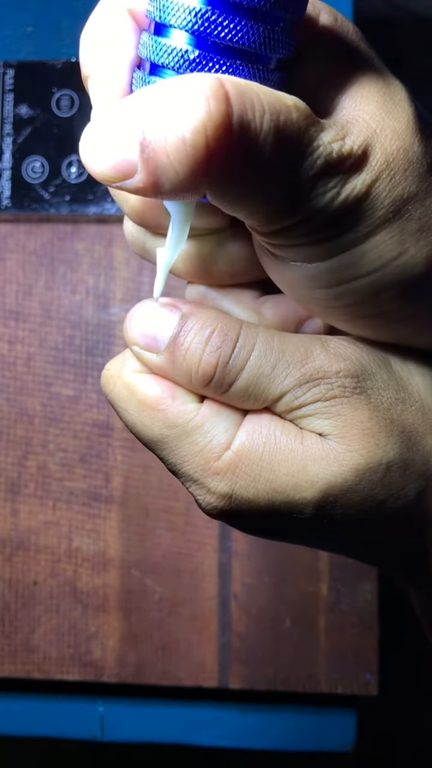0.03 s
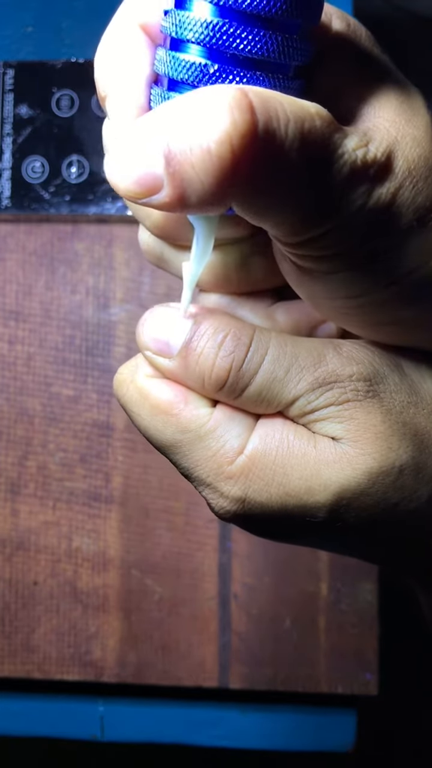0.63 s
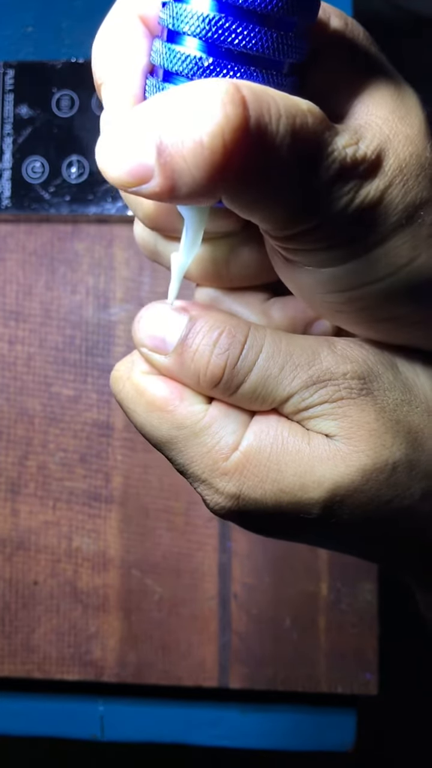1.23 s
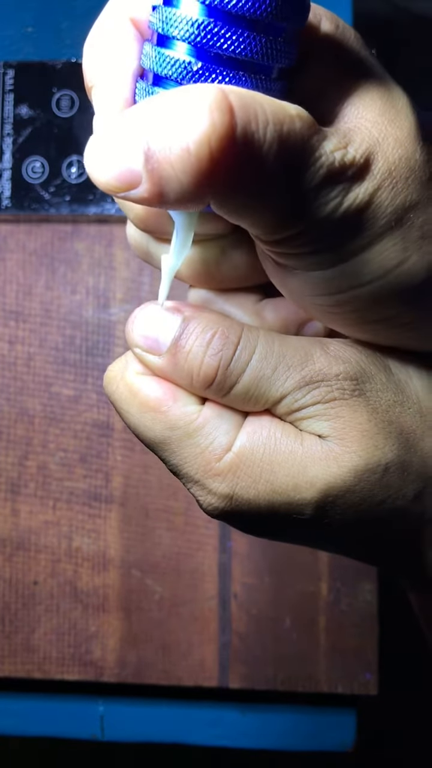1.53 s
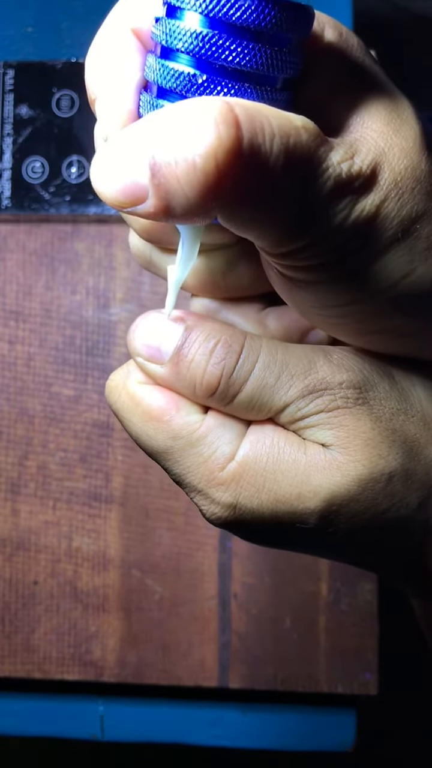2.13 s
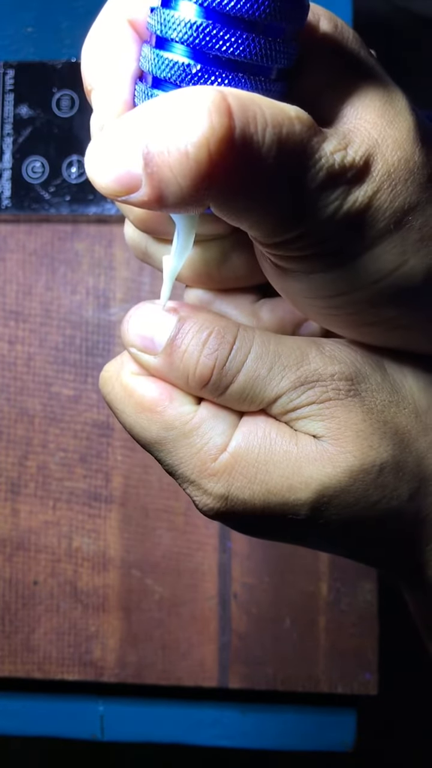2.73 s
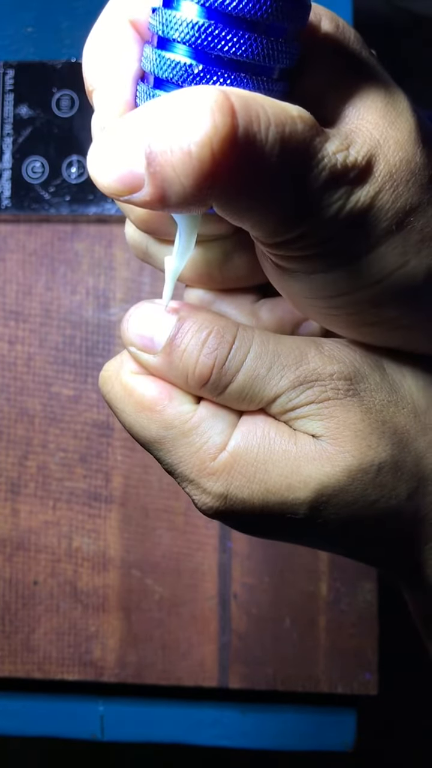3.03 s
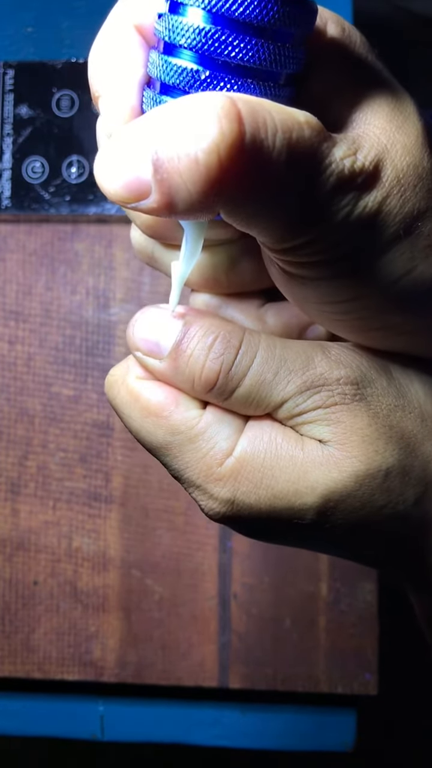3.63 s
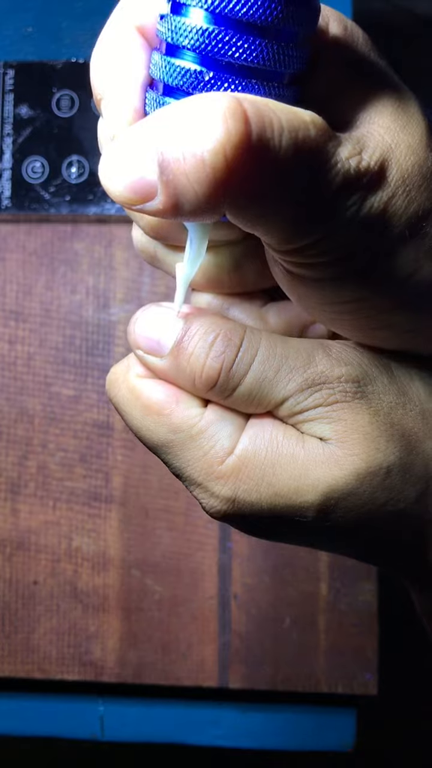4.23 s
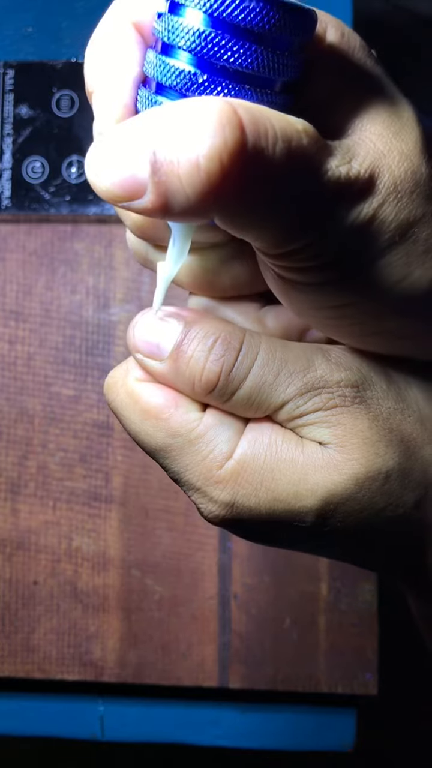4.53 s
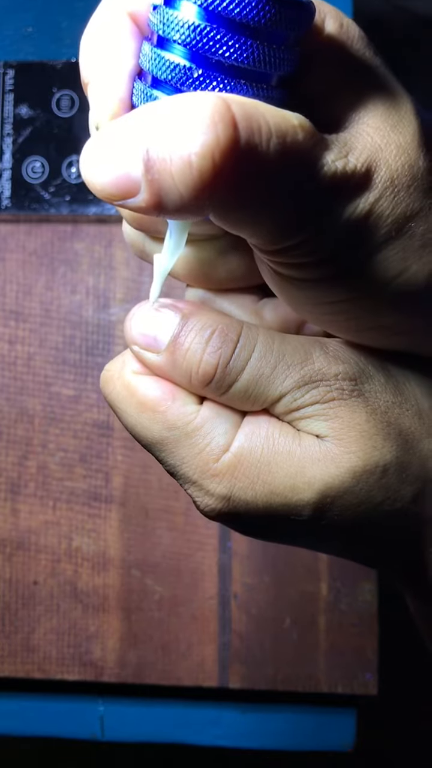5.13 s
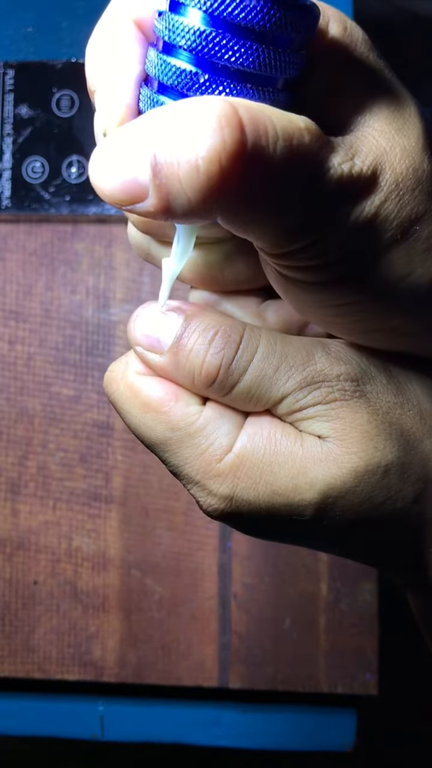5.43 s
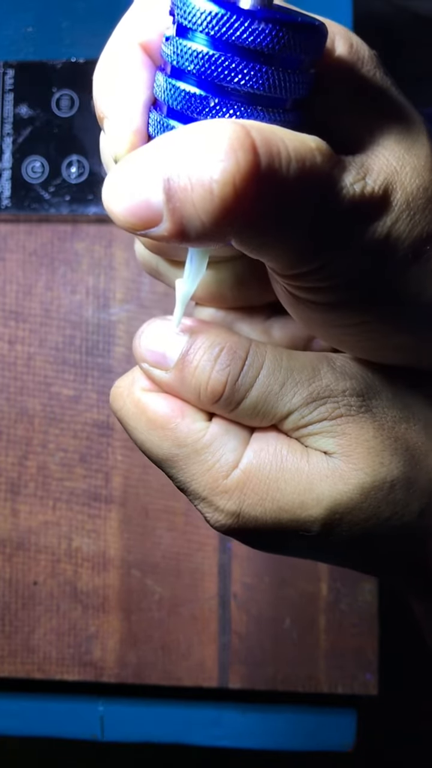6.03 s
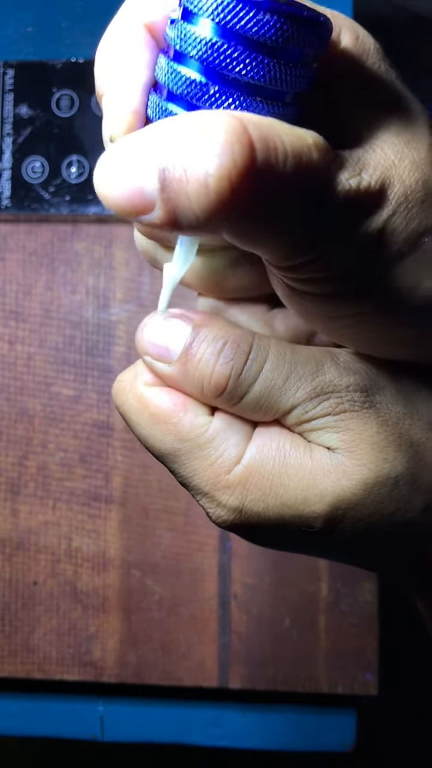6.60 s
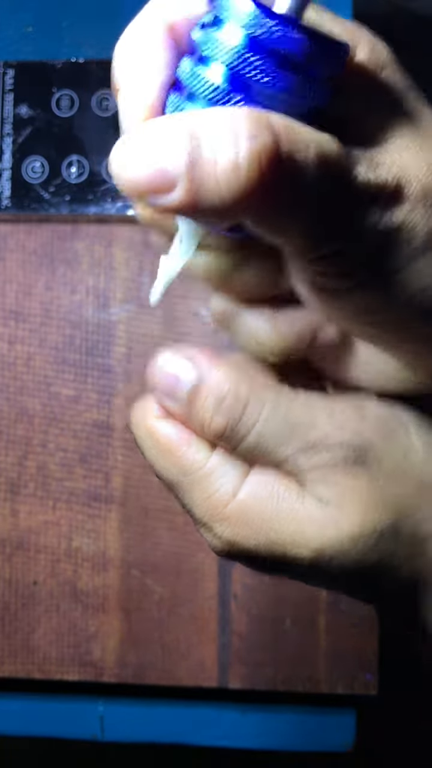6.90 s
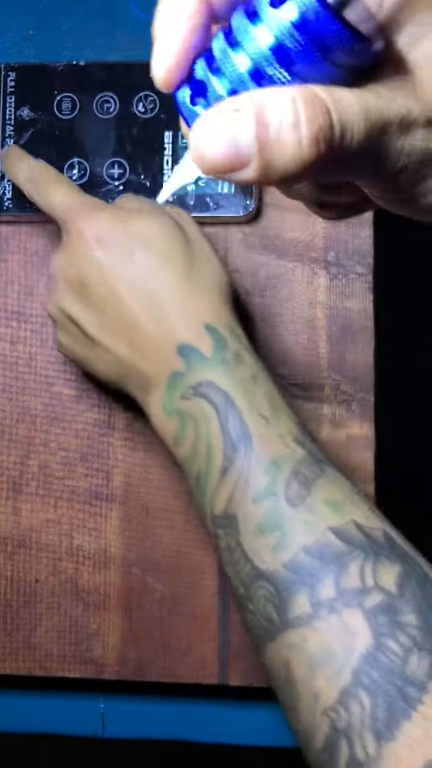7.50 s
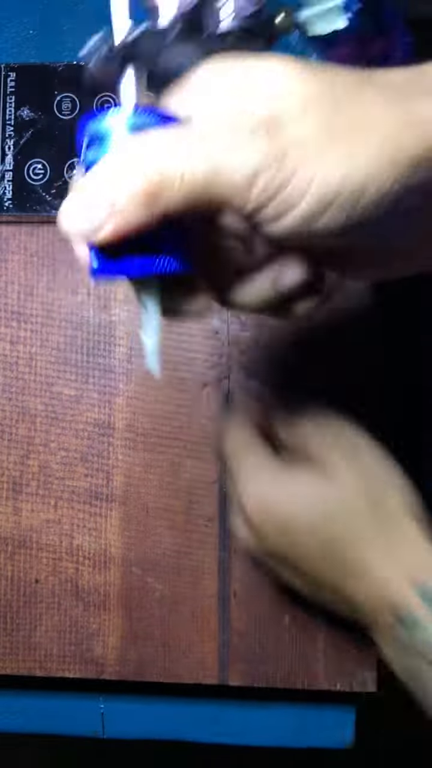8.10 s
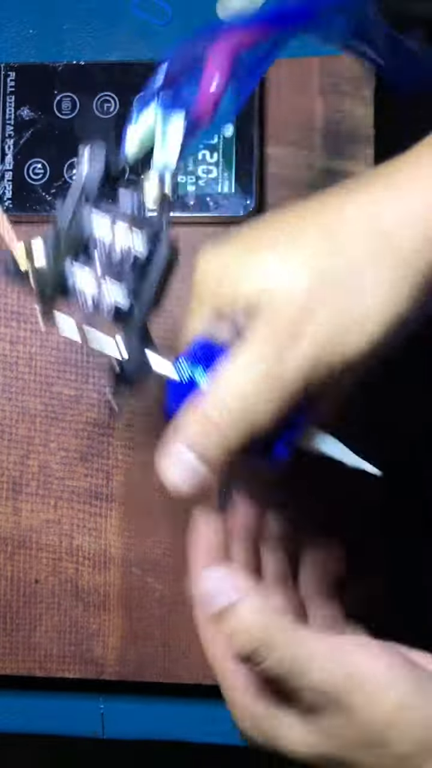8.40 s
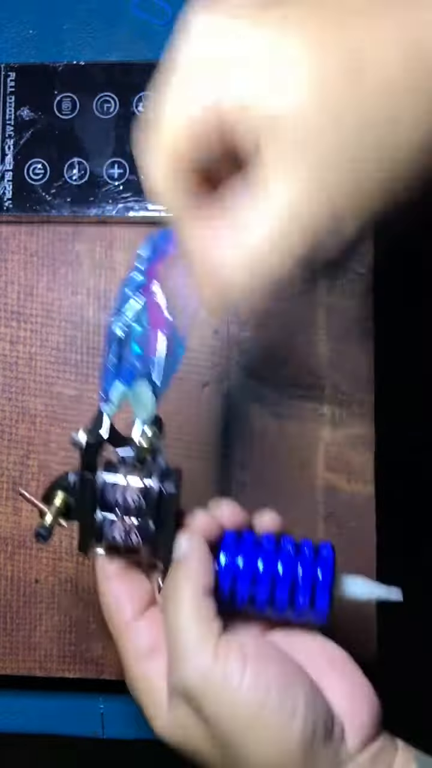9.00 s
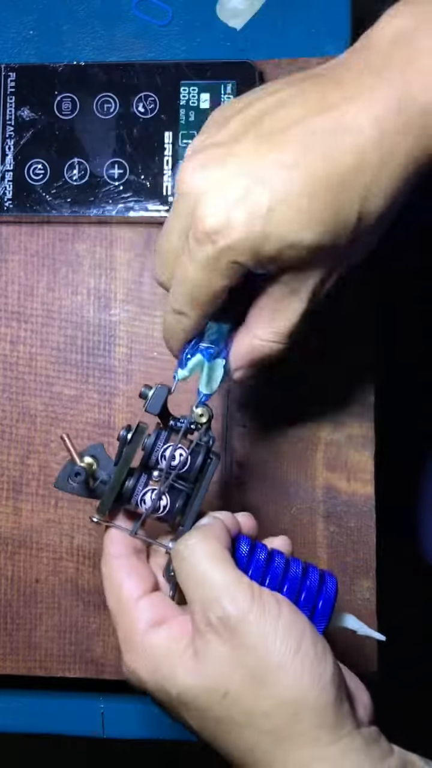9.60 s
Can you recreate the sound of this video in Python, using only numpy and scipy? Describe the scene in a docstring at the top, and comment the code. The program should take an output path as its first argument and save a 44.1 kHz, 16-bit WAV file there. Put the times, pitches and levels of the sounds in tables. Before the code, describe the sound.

Close up over a wooden workbench in a quiet room, a tattoo machine gives a continuous, sharp, rattling buzz with little bass, wavering slightly under finger pressure. Near the end the buzz opens up, then stops abruptly with a tiny squeal and a fading ring from its spring. Much quieter handling follows: soft knocks on the wood, crackling and rustling of a plastic sleeve, and small metal taps.

```python
"""A coil tattoo machine buzzes close by over a wooden workbench, its tip held against a thumbnail.
The armature strikes the coils 112 times a second, exciting the resonances of frame and tube; each
press on the nail brakes it a little and shifts its timbre. Near 7 s the tip lifts and the tone opens up.
At 7.7 s the power is cut, and the spring chatters and rings out. The machine is then turned over:
its plastic cord sleeve crinkles, the bench is knocked and the cord's wire clip taps the frame."""
import sys
import numpy as np
from scipy import signal
from scipy.fft import rfft, irfft
from scipy.io import wavfile
from scipy.ndimage import uniform_filter1d

SR = 44100
rng = np.random.default_rng(int(sys.argv[2]) if len(sys.argv) > 2 else 0)


def inscribe(sig):
    """Save sig as 16-bit PCM at rate SR to the path in sys.argv[1].

    A 1-D sig is mono; a 2-D sig holds one channel per row.
    Samples are clipped to [-1, 1] before scaling.
    """
    pcm = np.round(np.clip(np.atleast_2d(sig).T, -1, 1) * 32767)
    wavfile.write(sys.argv[1], SR, pcm.astype(np.int16))


N = 429975
TIME = np.arange(N) / SR
POWER_OFF_S = 7.732


def from_db(db):
    """Amplitude ratio of a level in decibels."""
    return np.exp(np.asarray(db) * (np.log(10) / 20))


def unit_rms(x):
    """Normalisation to unit power."""
    return x / np.sqrt(np.mean(x ** 2) + 1e-20)


def in_time(rows):
    """Linear interpolation of (time, values...) rows at every sample."""
    times, *columns = np.transpose(rows)
    return [np.interp(TIME, times, column) for column in columns]


def drift(per_s):
    """Random modulation: Gaussian values joined by straight lines."""
    count = int(per_s * N / SR) + 3
    return np.interp(TIME * per_s, np.arange(count), rng.standard_normal(count))


def swells(rows, rise_share=0.47, depth_db=19.5):
    """Exponential growth and decay about each (time, level, duration) peak; overlaps add in power."""
    power = 0
    for s, db, length in rows:
        distance = np.maximum((s - TIME) / rise_share, (TIME - s) / (1 - rise_share)) / length
        power = power + from_db(db - depth_db * np.minimum(distance, 10)) ** 2
    return np.sqrt(power)


def high_pass(x, hz, order=3):
    """Butterworth high-pass filter."""
    return signal.sosfilt(signal.butter(order, hz, "high", fs=SR, output="sos"), x)


def coloured(x, spectrum):
    """Minimum-phase filter of unit power gain, shaped by (frequency, level) rows."""
    hz, db = np.transpose(spectrum)
    grid = np.linspace(1, SR / 2, 2049)
    cepstrum = irfft(np.log(from_db(np.interp(np.log(grid), np.log(hz), db))))
    cepstrum[1:len(grid) - 1] *= 2
    cepstrum[len(grid):] = 0
    response = irfft(np.exp(rfft(cepstrum)))
    return signal.fftconvolve(x, response / np.linalg.norm(response))[:N]


def resonance(x, hz, width_hz):
    """Forced response of a two-pole resonator with unit peak gain."""
    r = np.exp(-np.pi * width_hz / SR)
    feedback = [1, -2 * r * np.cos(2 * np.pi * hz / SR), r * r]
    return signal.lfilter(np.array([1, 0, -1]) * (1 - r * r) / 2, feedback, x + 1e-18)


def ring(force, modes):
    """Modal superposition: an impulse starts one damped sinusoid per (frequency, level, T60) row."""
    out = 0
    for k, (hz, db, t60) in enumerate(modes):
        r, w = from_db(-60 / (t60 * SR)), 2 * np.pi * hz / SR
        mode = signal.lfilter([0, np.sin(w)], [1, -2 * r * np.cos(w), r * r], force + 1e-18)
        out = out + (-1) ** k * from_db(db) * mode
    return out


def impulses(times, heights):
    """Band-limited impulses: windowed sinc pulses placed between the samples."""
    centres = np.asarray(times)[:, None] * SR
    taps = centres.astype(int) + np.arange(-7, 9)
    shape = np.sinc(taps - centres) * np.sinc((taps - centres) / 8)
    out = np.zeros(N)
    np.add.at(out, np.clip(taps, 0, N - 1), shape * np.asarray(heights)[:, None])
    return out


# Spectrum of the workshop air: (frequency [Hz], relative density [dB])
AIR_SPECTRUM = [(20, -30), (45, -1), (70, -2.5), (120, -5.5), (400, -9.5), (1000, -9), (1600, -13),
                (2800, -18), (6000, -23), (16000, -43)]
# Swells of low rumble: (time [s], peak level [dB], duration [s])
RUMBLE_SWELLS = [(4.65, -67, 1.6), (5.7, -60, 2.5), (8.7, -70, 5.5)]
# Envelope of a faint hiss: (time [s], level before filtering [dB])
HISS_LEVELS = [(7.6, -54), (8.15, -58.5), (8.4, -68), (8.95, -73.5), (9.1, -63), (9.75, -63.5)]
def background(air_db=-60):
    """Ambient noise: steady air, swelling rumble and hiss add as incoherent sources."""
    air = from_db(air_db) * coloured(rng.standard_normal(N), AIR_SPECTRUM)
    rumble_spectrum = [(20, -17), (48, -6), (130, -12), (280, -10), (600, -19), (2000, -42.5)]
    rumble = swells(RUMBLE_SWELLS) * coloured(rng.standard_normal(N), rumble_spectrum)
    hiss = from_db(in_time(HISS_LEVELS)[0]) * high_pass(rng.standard_normal(N), hz=2480, order=1)
    return high_pass(air + rumble, hz=36, order=4) + hiss


# Faint tones: (start [s], duration [s], first pitch [Hz], middle pitch [Hz], last pitch [Hz], level [dB])
TONE_GLIDES = [(7.75, 0.66, 2150, 2297, 2290, -66), (7.698, 0.973, 567.6, 559.8, 507, -64),
               (7.798, 0.59, 1390, 1379, 1393, -69.5), (8.248, 0.24, 1150, 1249, 1298, -63),
               (8.398, 0.657, 1400, 1423, 1404, -66), (8.499, 0.345, 1255, 1263, 1253, -69),
               (9.22, .6, 13200, 14500, 13000, -60.5)]
def faint_tones(blur_at_1khz_per_s):
    """Narrow-band noise: random modulation blurs thin tones that swell, glide and fade."""
    out = np.zeros(N)
    for s, length, first, middle, last, db in TONE_GLIDES:
        span = (TIME > s) & (TIME < s + length)
        progress = (TIME[span] - s) / length
        hz = np.polyval(np.polyfit([0, .5, 1], [first, middle, last], 2), progress)
        phase = 2 * np.pi * np.cumsum(hz) / SR
        per_s = blur_at_1khz_per_s * np.sqrt(middle / 1000)
        tone = drift(per_s)[span] * np.sin(phase) + drift(per_s)[span] * np.cos(phase)
        out[span] += from_db(db) * np.sin(np.pi * progress) * tone
    return out


def room(x, t60_s=0.18, level_db=-10.5, delay_s=0.004):
    """Reverberation: a thin, diffuse tail decays exponentially after the nearest walls answer."""
    age = TIME[:SR // 2]
    tail = rng.standard_normal(len(age)) * from_db(-60 * age / t60_s) * (age > delay_s)
    treble = high_pass(x, hz=2225, order=1)
    return from_db(level_db) * signal.fftconvolve(treble, tail / np.linalg.norm(tail))[:N]


# Knocks on the bench: (time [s], relative level [dB])
BENCH_KNOCKS = [(7.904, -45), (8.049, -57), (8.865, -68), (9.112, -56.5), (9.391, -53), (9.644, -63)]
# Modes of the bench top: (frequency [Hz], relative level [dB], T60 [s])
BENCH_MODES = [(368, -2, 0.29), (942, 3.5, 0.118), (1071, 7, 0.069), (1433, -1, 0.082), (1782, -7.5, 0.049),
               (2465, 5, 0.072)]
def bench_knocks(wood_db, crack_db, crack_s):
    """Impact excitation: each knock rings the modes of the wood under a dull crack."""
    times, db = np.transpose(BENCH_KNOCKS)
    hits = impulses(times, from_db(db))
    envelope = signal.lfilter([1], [1, -np.exp(-1 / (crack_s * SR))], hits)
    crack_spectrum = [(200, -17.5), (1000, 1.5), (2800, -1), (5000, -12), (15000, -16)]
    crack = coloured(envelope * rng.standard_normal(N), crack_spectrum)
    return from_db(wood_db) * ring(hits, BENCH_MODES) + from_db(crack_db) * crack


# Taps of the cord's wire clip: (time [s], ring level [dB], frequency [Hz])
CLIP_TAPS = [(9.304, -47, 2700), (9.311, -49, 3000), (9.4535, -42, 2500), (9.4712, -42, 2700),
             (9.484, -47, 3100), (9.512, -47, 3000), (9.729, -44, 3550)]
def clip_clinks(t60_s, tick_db):
    out = 0
    for s, db, hz in CLIP_TAPS:
        tick = high_pass(impulses([s], [from_db(db + tick_db)]), hz=2000, order=1)
        out = out + tick + ring(impulses([s], [1]), [(hz, db, t60_s)])
    return out


# Hand movements on the sleeve: (time [s], peak level [dB], duration [s])
HAND_MOVES = [(8.568, -51.5, 0.194), (8.805, -49.5, 0.11), (9.075, -56.5, 0.356), (9.25, -51.5, 0.162),
              (9.40, -47, 0.21), (9.647, -41, 0.058), (9.74, -62, 0.14)]
# Spectrum of the rustle: (frequency [Hz], relative density [dB])
RUSTLE_SPECTRUM = [(180, -38), (300, -7), (546, -17), (584, -5.5), (1040, -1), (1660, -3), (2740, 2),
                   (7000, -0.5), (10700, -6.5), (14000, 0), (16000, -11)]
def sleeve_rustle(creases_per_s, spread_db, slide_db):
    """Shot noise and friction: tiny creases flip over the hiss of fingers sliding on plastic."""
    sizes = from_db(spread_db * np.minimum(rng.exponential(1, N), 4)) * rng.choice([-1, 1], N)
    creases = unit_rms(sizes * (rng.random(N) < creases_per_s / SR))
    sliding = from_db(slide_db) * rng.standard_normal(N)
    return coloured(swells(HAND_MOVES) * unit_rms(creases + sliding), RUSTLE_SPECTRUM)


# Loudest snaps of the sleeve: (time [s], relative level [dB], treble shelf [dB], ring frequency [Hz])
CREASE_SNAPS = [(8.313, -44, 1, 5000), (8.4717, -44, 5, 5500), (8.492, -47, 3, 5000),
                (8.5063, -40, 2.5, 5500), (8.514, -42, 2, 5800), (8.53, -39, 4, 5200),
                (8.549, -42, 3, 5000), (8.566, -34.5, 7, 4300), (8.575, -36, 2, 4400),
                (8.623, -34.5, 4, 7200), (8.661, -46, -2.5, 6800), (8.767, -45, 5, 7100),
                (8.7888, -40, -1, 5000), (8.819, -40, 7, 5320), (8.908, -42, -14, 3500),
                (8.931, -48, -3, 6800), (9.03, -45, 1, 9500), (9.0915, -42, 1, 2900),
                (9.109, -44, 3.5, 2700), (9.19, -45, 3.5, 4500), (9.215, -35, 0, 9400),
                (9.248, -44, 4, 5000), (9.364, -39, -2, 5000), (9.368, -38, -2, 5000),
                (9.3745, -35, -3, 5000), (9.3895, -28, 1, 3500), (9.397, -37, 1, 3000),
                (9.402, -36, 0, 4500), (9.419, -36.5, -1, 8500), (9.427, -38, 0, 4000),
                (9.439, -38, 0, 4500), (9.471, -41, 0, 5500), (9.4895, -40, 0, 3000),
                (9.541, -39, -4, 5000), (9.5747, -42, 1, 6000), (9.6107, -35.5, 1, 7480),
                (9.62, -42, -3, 4500), (9.639, -35, -3, 4000), (9.646, -27.5, -5, 3220),
                (9.653, -35, -4, 3500), (9.725, -44, -4, 3400)]
# Spectrum of the snaps: (frequency [Hz], relative density [dB])
SNAP_SPECTRUM = [(290, -32.5), (500, -11), (1190, -3), (1600, -8), (2650, -1.5), (4280, -1), (7100, -2),
                 (10800, -2), (14700, -2.5), (16000, 3.5)]
def sleeve_snaps(gain_db, fade_s, tail_db, tail_s, ring_db):
    """Buckling: a crease flips with a crack and a short tail, ringing its own patch of plastic."""
    out, age = np.zeros(N), TIME[:SR // 20]
    envelope = np.exp(-age / fade_s) + from_db(tail_db) * np.exp(-age / tail_s)
    for s, db, treble_db, ring_hz in CREASE_SNAPS:
        burst = rng.standard_normal(len(age)) * envelope
        burst = burst + from_db(ring_db) * resonance(burst, ring_hz, width_hz=345)
        burst = burst + (from_db(treble_db) - 1) * high_pass(burst, hz=6020, order=1)
        start = int(s * SR)
        out[start:start + len(age)] += from_db(db + gain_db) * burst[:N - start]
    return coloured(out, SNAP_SPECTRUM)


# Long-lived modes of the steel frame: (frequency [Hz], level [dB], T60 [s])
FRAME_MODES = [(1450, -45, 0.254), (3070, -51, 0.23), (3591, -44, 0.33)]
def run_down(spring_hz, squeal_db, squeal_s, ramp_s, spring_db, spring_t60_s):
    """Chatter, then free decay: the spring squeals on the contact screw, and spring and frame ring on."""
    age = np.maximum(TIME - POWER_OFF_S, 0)
    envelope = (1 - np.exp(-age / ramp_s)) * np.exp(-np.maximum(age - squeal_s, 0) / ramp_s)
    squeal = from_db(squeal_db) * envelope * np.sqrt(2) * np.sin(2 * np.pi * spring_hz * age)
    modes = FRAME_MODES + [(spring_hz, spring_db, spring_t60_s)]
    return squeal + ring(impulses([POWER_OFF_S], [1]), modes)


# Presses on the nail: (start [s], duration [s], slowing [Hz], frame gain [dB], needle pressure [1])
NAIL_PRESSES = [(-.05, 0.19, 0.55, -0.5, 1.1), (0.57, 0.21, 0.551, 0.5, 0.63),
                (1.082, 0.46, 0.645, 0.2, 0.94), (1.916, 0.1466, 0.53, -4, -0.66),
                (2.417, 0.052, 0.63, -2, -0.45), (4.221, .9, .48, 0.47, 0.92),
                (6.309, 0.083, 0.39, -2.5, -0.41), (6.536, 0.232, 0.43, 0.6, 0.76)]
def nail_loading(ramp_s=0.082):
    """Mechanical loading: slowing, frame gain and needle pressure ramp in and out with each press."""
    curves = 0
    for s, length, *effects in NAIL_PRESSES:
        contact = np.clip(np.minimum(TIME - s, s + length - TIME) / ramp_s + .5, 0, 1)
        curves = curves + np.outer(effects, contact)
    return curves


def grip_level(pressure, lift, resting_db, pressed_db, lifted_db):
    """Linear blend in decibels of three boundary conditions: tip resting, pressed and lifted."""
    return (1 - lift) * (resting_db + pressure * (pressed_db - resting_db)) + lift * lifted_db


# Armature harmonics: (harmonic number, resting level [dB], pressed level [dB], lifted level [dB])
HUM_HARMONICS = [(1, -61, -61, -61.5), (2, -68, -73.5, -75.5), (3, -72.5, -71.5, -72), (4, -66, -63.5, -63),
                 (5, -64, -69.5, -71), (6, -67, -69, -65), (7, -74, -73, -80)]
def armature_hum(cycles, pressure, lift, waver_db=1.4, fade_s=0.029):
    """Periodic motion radiates a harmonic series; the overtones fade and return with the grip."""
    out = 0
    for harmonic, *levels in HUM_HARMONICS:
        db = grip_level(pressure, lift, *levels) + waver_db * (harmonic > 1) * drift(3)
        out = out + from_db(db) * np.sin(2 * np.pi * (harmonic * cycles + rng.random()))
    return np.sqrt(2) * out * np.exp(-np.maximum(TIME - POWER_OFF_S, 0) / fade_s)


def levelled(buzz):
    """Gain control holds the running buzz at unit rms, then freezes so that its ring-out can fade."""
    power = uniform_filter1d(buzz ** 2, size=2756, mode="mirror")   # seven cycles
    held = np.interp(np.minimum(TIME, POWER_OFF_S - .04), TIME, power)
    return buzz / np.sqrt(np.abs(held) + 1e-20)


def gripped(x, peaks, pressure, lift, finger_db, shifts_per_s=11):
    """Resonances and antiresonances in cascade follow the grip and waver as the fingers shift."""
    block = 32   # samples per gain step
    pressure, lift = pressure[::block], lift[::block]
    waver_db = finger_db * (1 + 2 * np.sqrt(np.abs(np.sin(np.pi * lift))))   # greatest in mid-lift
    for hz, width_hz, *levels in peaks:
        gain = from_db(grip_level(pressure, lift, *levels) + waver_db * drift(shifts_per_s)[::block])
        x = x + np.repeat(gain - 1, block)[:N] * resonance(x, hz, width_hz)
    return levelled(x)


# Gliding peaks and dips: (start [s], duration [s], from [Hz], to [Hz], bandwidth [Hz], gain [dB])
MOTION_SWEEPS = [(6.75, 0.53, 1380, 1300, 180, 5.5), (6.86, 0.16, 1800, 2750, 500, -14),
                 (6.95, .3, 2740, 3000, 360, -18.5), (6.93, 0.35, 3600, 3560, 350, -4.5),
                 (6.8, .4, 4900, 4700, 700, 6.5), (6.85, .3, 10300, 9200, 1300, -8),
                 (6.77, .34, 14900, 14700, 1500, -4), (7.08, 0.18, 13600, 15200, 600, 9),
                 (7.14, .26, 15000, 13500, 1200, -11), (7.33, .6, 11100, 10900, 900, -2.5)]
def swept(buzz):
    """Time-varying filtering: peaks and dips glide through the buzz as the machine moves in the air."""
    out = buzz.copy()
    for s, length, first, last, width_hz, db in MOTION_SWEEPS:
        span = (TIME > s) & (TIME < s + length)
        progress = (TIME[span] - s) / length
        carrier = np.exp(2j * np.pi * np.cumsum(first + (last - first) * progress) / SR)
        r = np.exp(-np.pi * width_hz / SR)
        band = np.real(carrier * signal.lfilter([1 - r, 1 - r], [1, -r], out[span] / carrier))
        out[span] += (from_db(db * np.sin(np.pi * progress)) - 1) * band
    return out


# Reflections off fingers and bench: (delay [s], polarity [+1 or -1])
REFLECTION_PATHS = [(.00093, -1), (.00147, 1), (.00205, 1)]
def with_reflections(treble, lift, still_db, lifted_db, sway_s):
    """Comb filtering: short echoes interfere with the treble; their paths sway more once lifted."""
    freedom = np.sqrt(np.minimum(4 * lift, 1))
    gain = from_db(still_db + (lifted_db - still_db) * freedom)
    sway = sway_s * (.12 + freedom * (1 - .6 * lift))
    oversampled = signal.resample_poly(treble, 4, 1)
    echoes = 0
    for delay, polarity in REFLECTION_PATHS:
        emitted_s = TIME - delay - sway * drift(9)
        echoes = echoes + polarity * np.interp(emitted_s * 4 * SR, np.arange(4 * N), oversampled)
    return (treble + gain * echoes) / np.sqrt(1 + len(REFLECTION_PATHS) * gain ** 2)


def needle_rattle(hits, rattle_db, fade_s):
    """Impact-driven noise: the needle rubs and rattles in its tube as each strike's energy decays."""
    r = np.exp(-1 / (fade_s * SR))
    energy = signal.lfilter([1 - r], [1, -r], hits ** 2 + 1e-18)
    return from_db(rattle_db) * np.sqrt(energy) * rng.standard_normal(N)


# Tube and needle peaks and dips: (frequency [Hz], bandwidth [Hz], resting [dB], pressed [dB], lifted [dB])
TUBE_RESONANCES = [(4460, 850, -10.5, -4, -24), (5820, 230, -7.5, -8, 0.5), (6170, 980, 5, 6, 13.5),
                   (6860, 400, -9.5, -11, 0), (7080, 402, 8, 5.5, 1.5), (7820, 580, -4, -5.5, -2.5),
                   (8760, 590, 4.5, 2, 3), (9790, 470, 5.5, 4, 6), (10170, 460, -6.5, -6, 3),
                   (11350, 300, 2.5, -1.5, 16), (11740, 756, 13, 11.5, 4), (12440, 370.0, 4.5, 0.5, 0.5),
                   (12960, 250, 2.5, -3, 7), (13600, 570, 10, 9, 8), (14630, 460.0, 5, -6, -5),
                   (14900, 400, 5.5, 10.5, 15.5)]
def tube(hits, pressure, lift):
    """Resonant filtering: tube and needle colour the sharp edge of each strike."""
    return gripped(high_pass(hits, hz=4420, order=2), TUBE_RESONANCES, pressure, lift, finger_db=0.8)


# Frame peaks and dips: (frequency [Hz], bandwidth [Hz], resting [dB], pressed [dB], lifted [dB])
FRAME_RESONANCES = [(906, 44, 13, 13.5, 7.5), (1105, 89, 1, -15, 0), (1250, 71, -5, 4.5, 2),
                    (1336, 70, -5, -5.5, 6), (1486.5, 54.4, 18, 18, 4.5), (1846, 690, -15.5, -21, -24),
                    (2020, 49, -2.5, 1, 10.5), (2120, 150, 6.5, 3.5, -14.5), (2950, 305, 7, 9, -6.5),
                    (3586, 96, 20, 19.5, 13), (3920, 490, 8, 8.5, -8)]
def steel_frame(hits, pressure, lift):
    """Forced vibration of a frame too heavy to follow the top treble and too small to radiate bass."""
    inertia = signal.butter(3, 4200, fs=SR, output="sos")
    force = signal.sosfilt(inertia, high_pass(hits, hz=2445, order=2))
    return gripped(high_pass(force, hz=700, order=4), FRAME_RESONANCES, pressure, lift, finger_db=0.45)


def strikes(cycles, jitter_s, uneven_db, rebound_db, rebound_s, contact_db, contact_s, wander_s):
    """Impulse train: each cycle the armature hits the core, rebounds, then ticks on the contact screw."""
    times = np.interp(np.arange(1, int(cycles[-1])), cycles, TIME)
    times = times[times < POWER_OFF_S]
    scatter = rng.standard_normal((len(times), 4))
    times = times + jitter_s * scatter[:, 0]
    force = from_db(uneven_db * scatter[:, 1])
    wander = wander_s * drift(2.5)[(times * SR).astype(int)]   # the grip shifts the later contacts
    rebound_times = times + rebound_s + wander / 2 + 2 * jitter_s * scatter[:, 2]
    contact_times = times + contact_s + wander + 4 * jitter_s * scatter[:, 3]
    rebound = high_pass(impulses(rebound_times, force * from_db(rebound_db)), hz=8600, order=2)
    contact = high_pass(impulses(contact_times, force * from_db(contact_db)), hz=10510)
    return impulses(times, force) + rebound + contact


# Speed of the unbraked armature: (time [s], strike rate [Hz])
STRIKE_RATE = [(0, 111.75), (1.85, 112.05), (2.25, 112.5), (3.3, 112.22), (6.6, 112.3), (7.08, 112.7),
               (7.2, 112.2), (7.73, 112)]
# Vibration of the two radiating parts: (time [s], frame level [dB], tube level [dB])
PART_LEVELS = [(0, -29.5, -23), (2.7, -28.5, -23.5), (3.1, -27.5, -23), (6.56, -27.5, -22),
               (6.75, -27.5, -23), (6.95, -28.5, -21), (7.17, -31, -21.5), (7.33, -29.5, -21),
               (7.7, -32.5, -22.5)]
# Position of the tip: (time [s], lift [0 on the nail, 1 clear])
TIP_LIFT = [(6.68, 0), (6.93, .22), (7.13, .6), (7.18, 1)]
def machine(rattle_in_frame_db=-8, tube_press_share=0.45):
    """Source and filter: strikes and rattle excite frame and tube, whose resonances follow the grip."""
    slowing_hz, press_db, pressure = nail_loading()
    cycles = np.cumsum(in_time(STRIKE_RATE)[0] - slowing_hz) / SR
    lift = np.clip(in_time(TIP_LIFT)[0], 0, 1)
    hits = strikes(cycles, jitter_s=3.6e-6, uneven_db=0.5, rebound_db=-19.5, rebound_s=0.00255,
                   contact_db=-24.5, contact_s=0.0051, wander_s=6e-5)
    rattle = needle_rattle(hits, rattle_db=-12.5, fade_s=0.0015)
    frame_db, tube_db = in_time(PART_LEVELS)
    tremor_db = 0.51 * drift(per_s=9.2)   # the unsteady hand
    frame = steel_frame(hits + from_db(rattle_in_frame_db) * rattle, pressure, lift)
    frame *= from_db(frame_db + press_db + tremor_db)
    treble = tube(hits + rattle, pressure, lift)
    treble = with_reflections(treble, lift, still_db=-17, lifted_db=-12, sway_s=3.5e-5)
    treble *= from_db(tube_db + tube_press_share * press_db + tremor_db)
    return swept(frame + treble) + armature_hum(cycles, pressure, lift)


def scene():
    """Superposition of handling and machine, their reverberation and the background."""
    direct = sleeve_rustle(creases_per_s=900, spread_db=4, slide_db=-6)
    direct += sleeve_snaps(gain_db=1.7, fade_s=0.00078, tail_db=-8, tail_s=0.0056, ring_db=4)
    direct += clip_clinks(t60_s=0.023, tick_db=6)
    direct += bench_knocks(wood_db=-4.5, crack_db=5, crack_s=0.011)
    direct += machine()
    direct += run_down(spring_hz=2544, squeal_db=-32.5, squeal_s=0.022, ramp_s=0.0029,
                       spring_db=-53, spring_t60_s=0.66)
    return (direct + room(direct) + background() + faint_tones(blur_at_1khz_per_s=70.2))[None]


def record(dry):
    """Band limiting: a steep elliptic low-pass removes the top treble."""
    cutoff_hz = 15950
    return signal.sosfilt(signal.ellip(12, .1, 80, cutoff_hz, fs=SR, output="sos"), dry)


dry = scene()
out = record(dry)
inscribe(out)
```